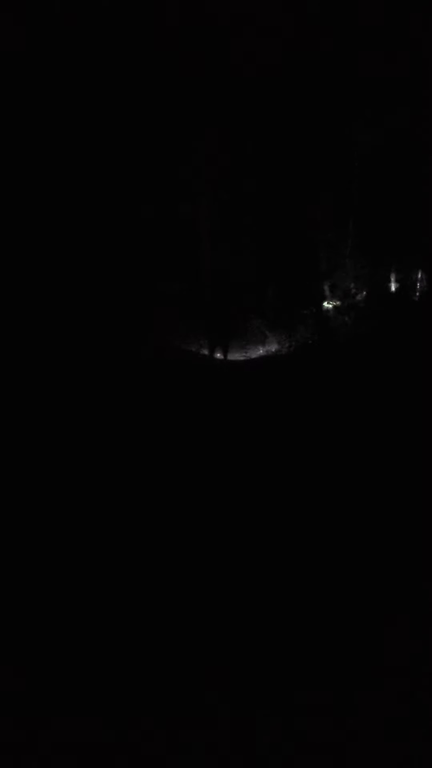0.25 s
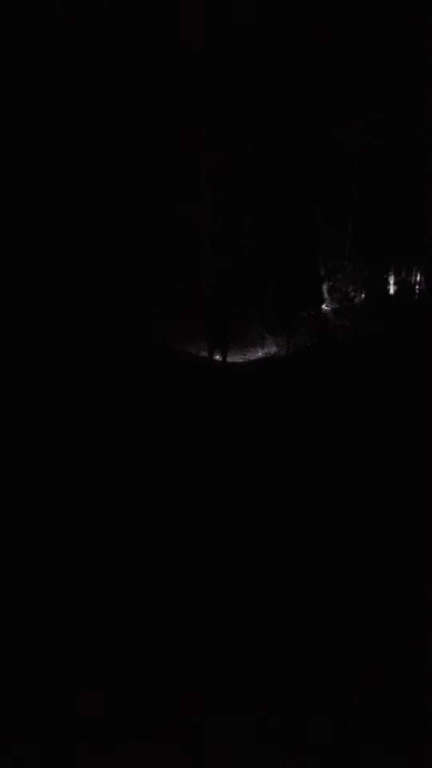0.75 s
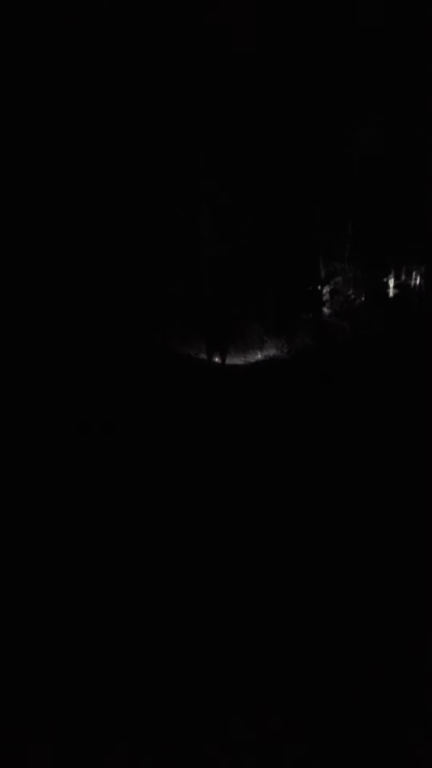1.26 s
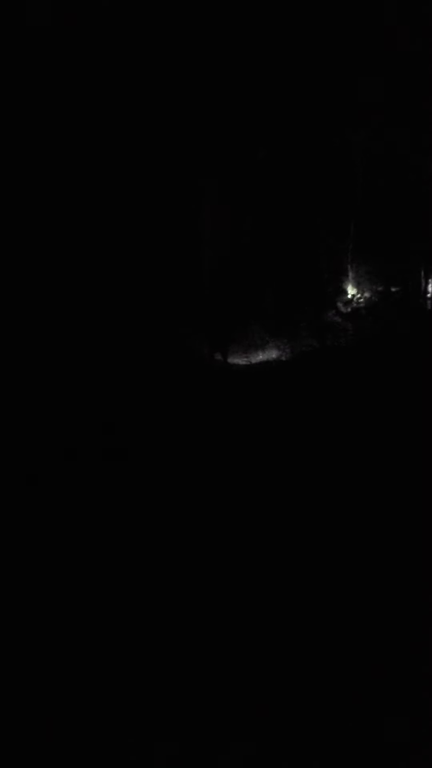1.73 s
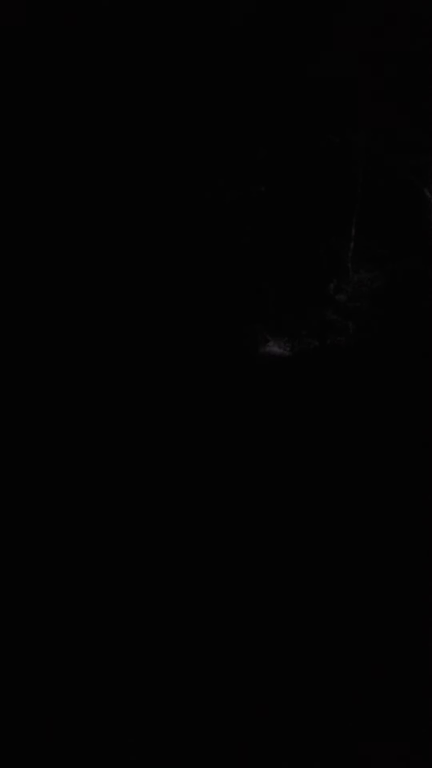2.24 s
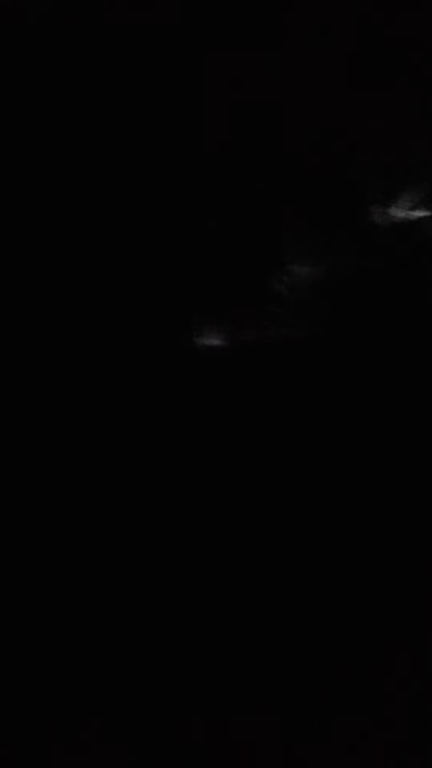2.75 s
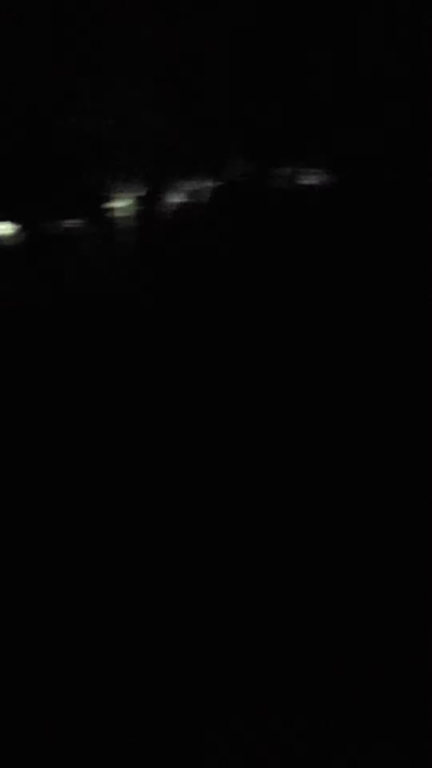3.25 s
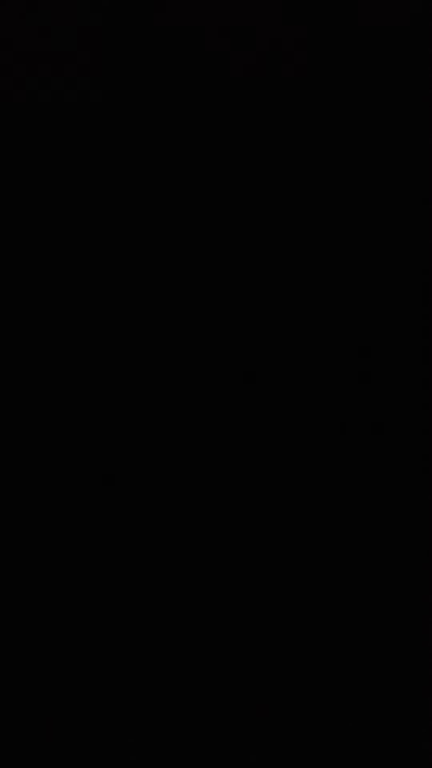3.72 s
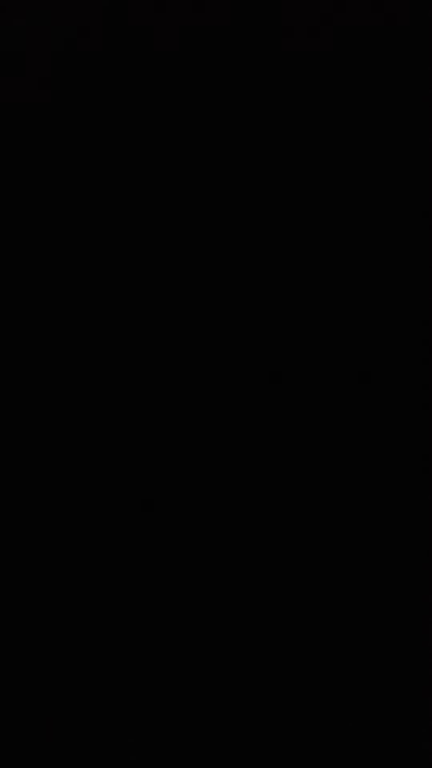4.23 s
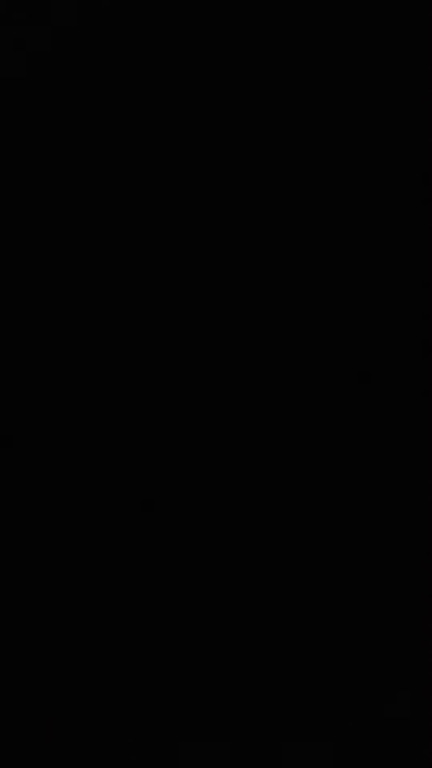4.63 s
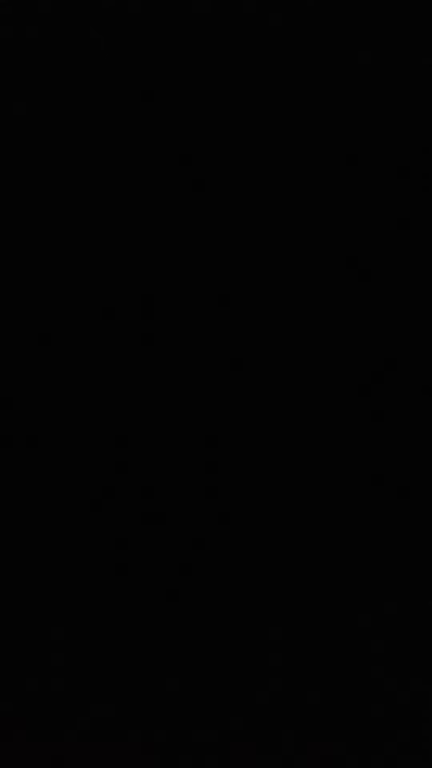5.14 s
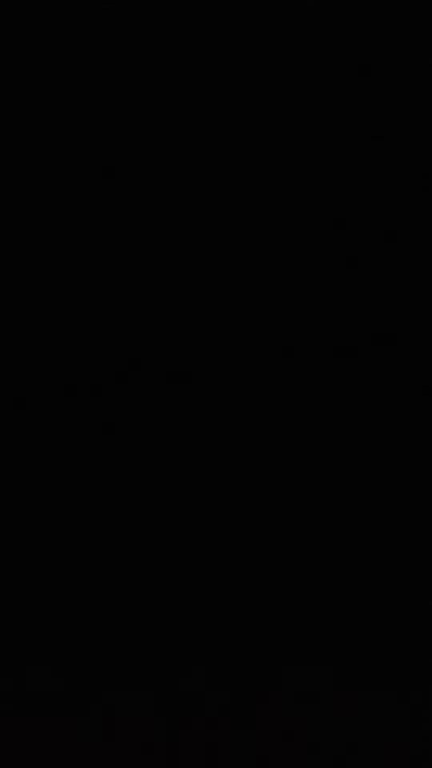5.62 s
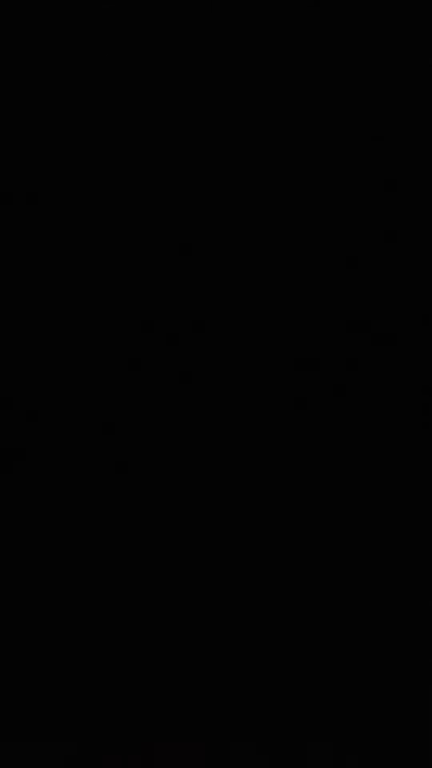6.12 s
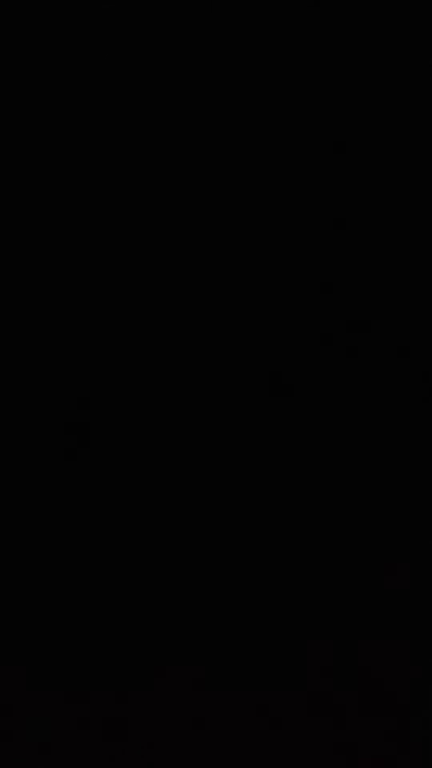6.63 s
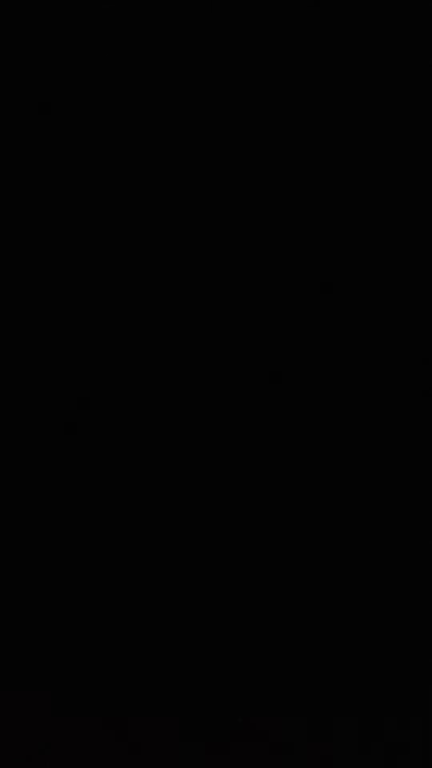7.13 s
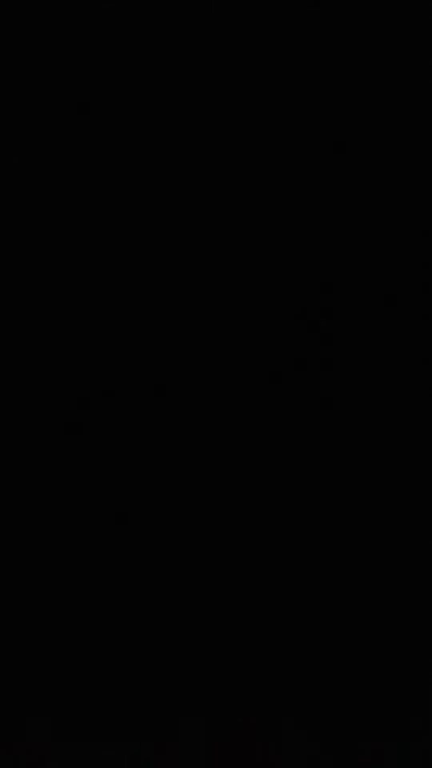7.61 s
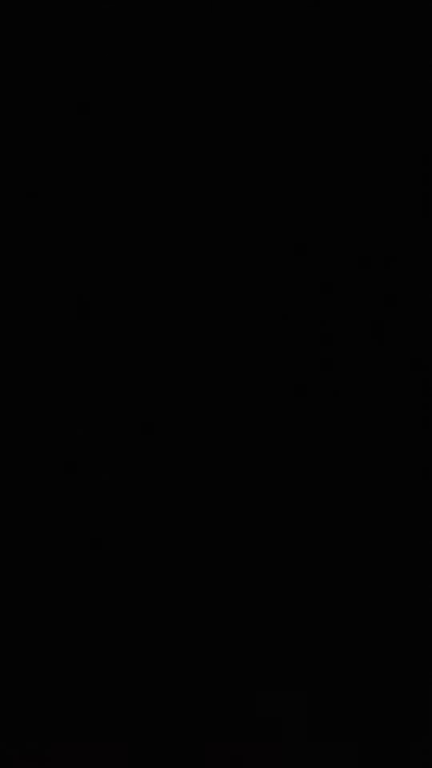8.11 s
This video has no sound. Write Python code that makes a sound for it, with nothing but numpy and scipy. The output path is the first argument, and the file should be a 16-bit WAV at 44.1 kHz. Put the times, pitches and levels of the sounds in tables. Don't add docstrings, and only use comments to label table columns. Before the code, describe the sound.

Hand-held phone in a dark forest: high crickets sing continuously, single crickets add brief trills, and raspy katydids throb over them with a soft woodland echo. Air bumps the left port first, then faint clicks, skin rustle and a few thin squeaks come close up. One hard crack and knock briefly pushes the insects down; they return and sing to the end. The right side is muffled.

```python
import sys
import numpy as np
from scipy import signal
from scipy.fft import rfft, irfft, next_fast_len
from scipy.io import wavfile
from scipy.ndimage import uniform_filter1d

SR = 44100
rng = np.random.default_rng(int(sys.argv[2]) if len(sys.argv) > 2 else 0)


def ratio(d):
    e = np.asarray(d, float) / 20
    return 10 ** e


def transcribe(signal):
    frames = np.atleast_2d(signal).T
    limited = np.clip(frames, -1, 1)
    pcm = np.round(limited * 32767).astype(np.int16)
    wavfile.write(sys.argv[1], SR, pcm)


N = 369116
TIME = np.arange(N) / SR
TOP_HZ = 15730

# pitch_hz, pitch_spread_hz, chirps_per_s, chirp_rate_spread (0-1),
# sounding_share of each cycle (0-1), level_db
CROWDS = [(2588.5, 38, 46, .15, .62, -48), (2414, 120, 50, .3, .5, -60), (2985, 130, 60, .3, .5, -59.5),
          (4708, 36, 45, .12, .65, -60.5), (4560, 90, 43, .12, 0.5, -62.5), (5576, 140, 72, 0.02, .4, -55),
          (5090, 160, 65, .2, .4, -62.5), (6040, 200, 60, 0.3, 0.5, -66)]
SINGERS = 20
COARSE = 16
# pitch_hz, chirps_per_s, sounding_share (0-1), level_db
EVEN_SINGER = (2984, 86.4, .55, -66)

# start_s, length_s, first_pitch_hz, level_db
TRILLS = [(0.21, 0.34, 4560, -54.5), (0.303, .30, 4700, -59), (1.166, 0.47, 4625, -56),
          (2.035, 0.26, 4560, -58.5), (2.532, 0.34, 4540, -57.5), (3.195, .30, 4580, -64),
          (3.699, 0.27, 4800, -66), (4.573, 0.264, 4560, -52), (4.719, .31, 4635, -52.5),
          (4.898, 0.23, 4360, -62), (6.304, 0.51, 4640, -62.5), (6.689, 0.25, 4560, -55.5),
          (6.925, 0.029, 4400, -62), (6.95, .2, 5030, -73)]
TRILL_RATE, CLIMB_HZ_PER_S = 42, 170
# start_s, level_db
LOW_TRILLS = [(.478, -63), (2.23, -64), (4.26, -65), (6.15, -69), (7.716, -66)]
LOW_HZ, LOW_S, LOW_RATE = 4180, 0.404, 50
# start_s, end_s, pitch_hz, level_db
SQUEAKS = [(3.505, 3.524, 14850, -53), (3.533, 3.545, 14800, -53), (3.553, 3.578, 14950, -62),
           (3.604, 3.619, 14750, -59), (3.52, 3.575, 10840, -58.5), (5.760, 5.785, 14850, -59.5)]

# first_stroke_s, end_s, level_db, wing_over_hiss_db, throb_depth (0-1)
SONGS = [(-.60, -0.03, -50, 1, .05), (0.062, 0.49, -64, 3.5, 0.24), (0.751, 2.044, -53, 1.5, 0.26),
         (0.932, 1.368, -46.5, 0.5, 0.06), (1.517, 2.088, -54.5, -1.5, 0.2), (2.102, 2.44, -66, 6, 0.2),
         (2.525, 2.843, -53.5, -2, 0.2), (2.803, 3.44, -55.5, 1.5, 0.18), (3.2, 3.407, -51, -3.5, 0.64),
         (3.742, 4.016, -54.5, -.5, 0), (4.633, 5.157, -48.5, 0, 0), (4.771, 5.246, -42.5, -0.5, 0.48),
         (5.866, 6.19, -64.5, 5, 0.17), (6.22, 6.618, -56, -1, 0.5), (6.693, 6.95, -48, -9, 0.9),
         (6.66, 7.31, -55.5, 1.5, 0), (7.296, 7.74, -45, 0, 0.16), (7.803, 8.18, -56, 0, 0.2),
         (8.365, 8.6, -55, 5.5, 0.2)]
# frequency_hz, level_db
HISS = [(5800, -39.5), (6600, -4.5), (8000, -8.5), (9150, -5.5), (10000, -3), (11400, 0.5), (13000, -3),
        (15000, -4.5), (15700, -6)]
# frequency_hz, level_db
WING = [(6200, -27.5), (6800, -14.5), (7400, -2), (7800, 0.5), (8200, -1.5), (8700, -10), (9300, -33.5)]
STROKE_S, STROKE_WIDTH_S = 0.0857, 0.022
ONSET_S, SWELL_DB, SWELL_S, TIRE_DB_PER_S = 0.067, -4.5, 0.064, -5.5
# hiss_db_per_s, wing_db_per_s
FADE_DB_PER_S = (-66, -41)
ECHO_DB, ECHO_DB_PER_S = -10, -28
WOODS_T60_S, WOODS_DB = 0.82, -5

# start_s, peak_db, strongest_ring_hz, left_minus_right_db, crack_db
TICKS = [(3.4030, -32, 1100, 30, -30), (3.4244, -18, 1420, 45, -40), (3.4412, -19.5, 960, 42, -19),
         (3.515, -40, 1300, 25, -30), (3.585, -43.5, 1200, 16, -30), (3.617, -47, 1500, 6, -36),
         (3.663, -43, 1580, 17, -30), (3.908, -52, 600, 20, -30), (3.947, -41, 790, 28, -25),
         (4.1105, -28.5, 2010, 32, -14), (4.808, -47, 1630, 14, -30), (5.025, -30, 1600, 29, -22),
         (5.076, -39, 600, 19, -30), (5.123, -40, 1750, 18, -30), (5.4175, -28, 710, 18, -14),
         (5.566, -58, 1500, 4, -14), (6.991, -56, 1520, 10.5, -7), (8.175, -62, 1100, 15, -5)]
# start_s, peak_db, strongest_ring_hz, left_minus_right_db, crack_db
SNAP = [
    (5.2906, -11.5, 1770, 10, -4),
    (5.3104, -7, 1250, 19, -16.5),
    (5.3127, -9, 1010, 18, -11),
]
# pitch_hz, level_db, ring_time_s
SNAP_RING = (12130, -14, 0.013)
# pitch_hz, ring_time_s
CASE = [(415, 0.011), (655, 0.019), (1050, 0.0084), (1260, 0.0065), (1500, 0.0066), (1990, 0.0085),
        (2500, 0.0018), (3300, 0.0027)]
CRACK_RATIO = 7.1
# middle_s, length_s, level_db, centre_hz
RUSTLE = [(3.106, 0.04, -59.5, 900), (3.176, 0.042, -55, 600), (3.181, 0.049, -56.5, 1500),
          (3.355, 0.087, -53.5, 960), (3.457, 0.044, -52, 1090), (3.60, .14, -60, 1300),
          (3.78, 0.056, -63, 500), (3.944, .08, -51.5, 490), (3.934, 0.089, -60, 1500),
          (4.042, 0.091, -57, 474), (4.118, 0.037, -55, 504), (4.202, 0.037, -60, 1380),
          (4.497, 0.11, -62, 700), (4.612, .07, -58.5, 1110), (4.809, 0.047, -62, 1500),
          (5.043, 0.039, -51, 1520), (5.059, 0.074, -58.5, 494), (5.358, 0.083, -76, 900),
          (6.402, 0.048, -65.5, 690), (7.444, 0.019, -63, 420)]
# middle_s, length_s, peak_db, swing_hz, port (0 left, 1 right)
PUFFS = [(1.805, 0.027, -22.5, 56, 0), (1.855, 0.081, -36.5, 55.4, 0), (1.92, .05, -28.5, 41.1, 0),
         (1.984, .03, -48, 40, 0), (2.114, 0.068, -61, 55.6, 0), (3.921, .03, -47, 60.2, 0),
         (4.146, 0.039, -44.5, 48.8, 0), (4.24, 0.068, -47, 49.1, 0), (4.34, .04, -47, 50, 0),
         (4.538, .03, -59, 55.4, 0), (5.055, 0.069, -54, 60, 0), (6.041, .05, -52, 45.5, 0),
         (7.436, 0.011, -50, 59.8, 0), (2.287, .03, -38, 59.5, 1), (2.319, .035, -35, 58.4, 1),
         (2.414, 0.041, -48, 55, 1), (3.621, 0.0215, -28.5, 60.3, 1), (5.315, 0.0095, -35, 75, 0),
         (4.939, .04, -49, 54, 1), (5.112, .12, -48, 50.2, 1), (7.949, .04, -42, 47.4, 1)]

# frequency_hz, level_db (per Hz)
OPEN_FLOOR = [(15, -102), (60, -91), (200, -101), (500, -96), (900, -101), (2000, -97), (3200, -95),
              (3700, -105), (4250, -103), (5000, -90), (6500, -101), (7800, -103), (9300, -111),
              (12000, -108)]
# frequency_hz, level_db (per Hz)
COVERED_FLOOR = [(10, -86), (40, -76), (70, -78), (150, -88), (400, -97), (800, -110), (2000, -112),
                 (4000, -121), (5100, -127), (6400, -136), (7300, -128), (8300, -134), (10500, -125),
                 (15000, -128)]
# frequency_hz, gain_db
COVER = [(1500, -25), (2600, -33), (3200, -36), (4700, -26), (5050, -36), (5500, -24), (5900, -28),
         (6300, -50), (7200, -42), (8000, -56), (9600, -40), (10800, -24), (12000, -37), (15500, -48)]
# slow_drop_db, slow_recovery_s, quick_drop_db, quick_recovery_s
DUCK = (-6.5, 2, -3, 0.06)
TURN_DB = -7


def level(x, db):
    return x * ratio(db) / np.sqrt(np.mean(x ** 2))


def colour(x, table):
    hz, db = np.transpose(table)
    size = next_fast_len(N, True)
    f = np.arange(size // 2 + 1) * SR / size + 1
    gain = ratio(np.interp(np.log(f), np.log(hz), db)) * (f < TOP_HZ)
    return irfft(rfft(x, size) * gain, size)[:N]


def walk(rate, size=N, sr=SR):
    hold = int(sr / rate)
    steps = np.repeat(rng.standard_normal(size // hold + 1), hold)
    return 1.3 * uniform_filter1d(uniform_filter1d(steps, hold), hold)[:size]


def add(out, x, s):
    i = max(int(s * SR), 0)
    out[..., i:i + x.shape[-1]] += x[..., :N - i]


def wings(hz, off_hz, rate, share, sr=SR, sag=0.017, wobble=.03, slip=.2):
    pace = rate * (1 + wobble * walk(6, size=len(off_hz), sr=sr))
    turns = rng.random() + np.cumsum(pace) / sr
    cycle = np.minimum(turns % 1 / np.clip(share, .3, .95), 1)
    start = slip * rng.standard_normal(int(turns[-1]) + 1)[turns.astype(int)]
    sagging_hz = (cycle < 1) * sag * hz * (cycle - .5)
    phase = start + np.cumsum(off_hz - sagging_hz) / sr
    return np.sin(np.pi * cycle) ** 2 * np.exp(2j * np.pi * phase)


def chorus():
    out = np.zeros(N)
    size, sr = next_fast_len(N // COARSE + 1), SR / COARSE
    for hz, spread_hz, rate, scatter, share, db in CROWDS:
        crowd = np.zeros(size, complex)
        for _ in range(SINGERS):
            swell = ratio(2.76 * walk(2.504, size=size, sr=sr))
            off_hz = spread_hz * (rng.standard_normal() + .3 * walk(1.2, size=size, sr=sr))
            own_rate = rate * (1 + scatter * rng.uniform(-1, 1))
            crowd += swell * wings(hz, off_hz, own_rate, share, sr=sr)
        fine = signal.resample(crowd, size * COARSE)[:N]
        out += level(np.real(fine * np.exp(2j * np.pi * hz * TIME)), db)
    hz, rate, share, db = EVEN_SINGER
    even = wings(hz, np.full(N, 1. * hz), rate, share, sag=0, wobble=.006, slip=.03)
    return out + level(even.real, db) * ratio(4.9 * walk(1.0))


def soloists():
    near, far = np.zeros((2, N))
    for t0, length, hz, db in TRILLS:
        n = int(length * SR)
        rising_hz = hz + CLIMB_HZ_PER_S * TIME[:n]
        song = wings(hz, rising_hz, TRILL_RATE, 0.82, sag=.008, wobble=.015, slip=0.08).real
        song = song * ratio(1.4 * walk(25, size=n))
        add(near, level(song, db + 0.21) * signal.windows.tukey(n, .1), t0)
    for t0, db in LOW_TRILLS:
        n = int(LOW_S * SR)
        song = wings(LOW_HZ, LOW_HZ + 8 * walk(8, size=n), LOW_RATE, 0.73, sag=.01, slip=.12).real
        song = song * ratio(2.7 * walk(20, size=n))
        blurred = song + 0.43 * np.roll(song, int(.012 * SR))
        add(far, level(blurred, db) * signal.windows.tukey(n, .15), t0)
    for t0, t1, hz, db in SQUEAKS:
        n = int((t1 - t0) * SR)
        phase = 2 * np.pi * np.cumsum(hz + 60 * walk(150, size=n)) / SR
        add(near, ratio(db) * np.hanning(n) * np.sin(phase), t0)
    return near, far


def katydids():
    t = TIME[::COARSE]
    power = np.zeros((2, len(t)))
    for t0, t1, db, wing_db, depth in SONGS:
        age, over = np.clip(t - t0, 0, t1 - t0), np.maximum(t - t1, 0)
        from_stroke_s = (((t - t0) / STROKE_S + .5) % 1 - .5) * STROKE_S
        stroke = np.exp(-(from_stroke_s / STROKE_WIDTH_S) ** 2) * np.clip(1 - over / ONSET_S, 0, 1)
        throb = 1 - np.clip(depth, 0, 1) * (1 - stroke)
        effort_db = db + SWELL_DB * np.exp(-age / SWELL_S) + TIRE_DB_PER_S * age
        effort = np.clip((t - t0) / ONSET_S + 1, 0, 1) * ratio(effort_db)
        echo = ratio(ECHO_DB + ECHO_DB_PER_S * over)
        fade = np.maximum(ratio(np.outer(FADE_DB_PER_S, over)), echo)
        power += (effort * throb * fade * ratio(np.array([[0], [wing_db]]))) ** 2
    hiss, wing = (np.interp(TIME, t, np.sqrt(p)) * ratio(0.46 * walk(14)) for p in power)
    clicks = rng.standard_normal((4, N)) * ratio(0.48 * walk(200))
    ports = []
    for a, b in (clicks[:2], clicks[2:]):
        ports.append(level(colour(a, HISS), 0) * hiss + level(colour(b, WING), 0) * wing)
    return ports


def woods(x):
    t = TIME[:int(WOODS_T60_S * SR)]
    tail = rng.standard_normal(len(t)) * np.exp(-np.log(1000) * t / WOODS_T60_S)
    wet = signal.fftconvolve(x, tail / np.sqrt(np.sum(tail ** 2)))[:N]
    return (x + ratio(WOODS_DB) * wet) / np.hypot(1, ratio(WOODS_DB))


def ticks_and_snap():
    out, t = np.zeros((2, N)), TIME[:2048]
    mode_hz, mode_t60 = np.transpose(CASE)[:, :, None]
    soft_start = 1 - np.exp(-t / 0.00014)
    for s, db, hz, pan_db, crack_db in list(TICKS) + list(SNAP):
        crack_hz = CRACK_RATIO * hz
        struck = ratio(-11 * np.abs(np.log2(mode_hz / hz)))
        edges_hz = [crack_hz / 3.23, min(crack_hz * 1.06, .4 * SR)]
        band = signal.butter(2, edges_hz, "band", fs=SR, output="sos")
        for port, gain_db, crack_gain_db in ((0, 0.0037, -4.5), (1, -pan_db, -21.5)):
            phase = 2 * np.pi * (mode_hz * t + 0.072 * rng.standard_normal(mode_hz.shape))
            ring = np.sum(struck * np.sin(phase) * np.exp(-np.log(1000) * t / mode_t60), axis=0)
            crack = signal.sosfilt(band, rng.standard_normal(len(t)))
            crack = crack * np.exp(-np.log(1000) * t / 0.0069)
            tick = ring / np.abs(ring).max() + 2 * ratio(crack_db + crack_gain_db) * crack
            sign = 2 * port - 1
            add(out[port], sign * ratio(db + 5.0 + gain_db) * soft_start * tick, s + port * 0.0004)
    hz, db, t60 = SNAP_RING
    add(out[0], ratio(db) * np.sin(2 * np.pi * hz * t) * np.exp(-np.log(1000) * t / t60), SNAP[0][0])
    return out


def rustle():
    out = np.zeros((2, N))
    for s, length, db, hz in RUSTLE:
        n = int(2 * length * SR)
        grains = rng.standard_normal(n) * ratio(4.3 * walk(180, size=n))
        band = signal.butter(2, [hz / 1.9, hz * 1.52], "band", fs=SR, output="sos")
        burst = level(signal.sosfilt(band, grains), db) * np.hanning(n)
        add(out, burst * ratio(np.array([[.8], [-26]])), s - length)
    return out


def fingers():
    no_bass = signal.butter(4, 310, "high", fs=SR, output="sos")
    return signal.sosfilt(no_bass, ticks_and_snap() + rustle())


def puffs():
    out = np.zeros((2, N))
    for s, length, db, hz, port in PUFFS:
        t = np.arange(-2 * length, 2 * length, 1 / SR)
        wavering_hz = hz * (1 + 0.172 * walk(39.6, size=len(t)))
        phase = 2 * np.pi * (np.cumsum(wavering_hz) / SR + rng.random())
        swing = np.sin(phase + 0.35 * np.sin(phase)) + 0.014 * np.sin(4.3 * phase)
        add(out[int(round(port))], ratio(db) * swing * np.exp(-(2 * t / length) ** 2), s - 2 * length)
    return out


def still_air():
    noise = rng.standard_normal((2, N)) * np.sqrt(SR / 2)
    left = colour(noise[0] * ratio(1.4 * walk(12)), OPEN_FLOOR)
    right = colour(noise[1] * ratio(2.3 * walk(9)), COVERED_FLOOR)
    return np.array([left, right])


def scene():
    slow_db, slow_s, quick_db, quick_s = DUCK
    snap_s = SNAP[0][0]
    snapped, after = TIME > snap_s, np.maximum(TIME - snap_s, 0)
    duck = ratio(snapped * (slow_db * np.exp(-after / slow_s) + quick_db * np.exp(-after / quick_s)))
    crowd = chorus()
    solo, far = soloists()
    buzz, covered_buzz = katydids()
    left = duck * (woods(crowd) + buzz) + 0.33 * solo + 0.55 * woods(solo) + woods(far)
    behind_cover = duck * (woods(crowd) + covered_buzz) + woods(solo + far)
    right = colour(behind_cover, COVER) * ratio(TURN_DB * snapped)
    return np.array([left, right]) + fingers() + puffs() + duck * still_air()


def top_cut(x):
    return signal.sosfilt(signal.butter(12, 17150, fs=SR, output="sos"), x)


def record(dry):
    top = signal.ellip(5, .3, 20, TOP_HZ, fs=SR, output="sos")
    mix = signal.sosfilt(top, dry)
    return top_cut(mix)


dry = scene()
out = record(dry)
transcribe(out)
```